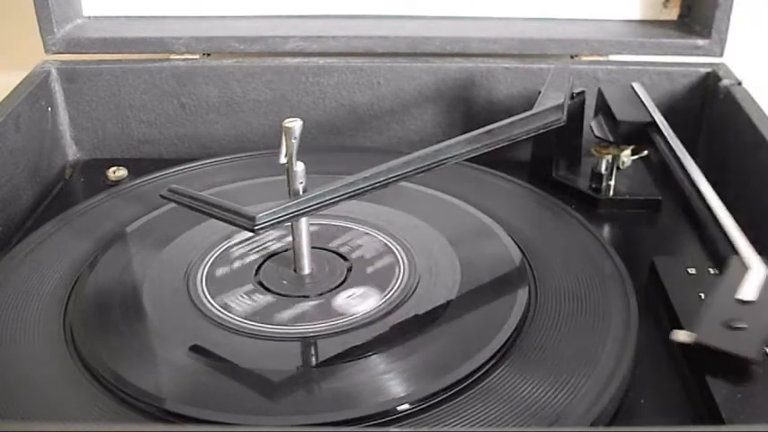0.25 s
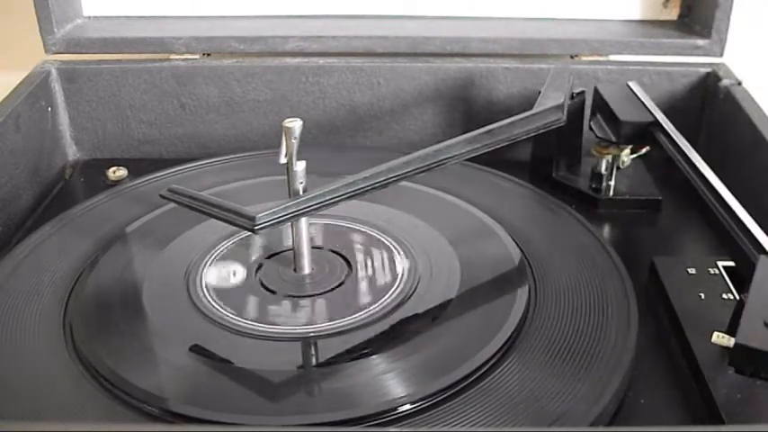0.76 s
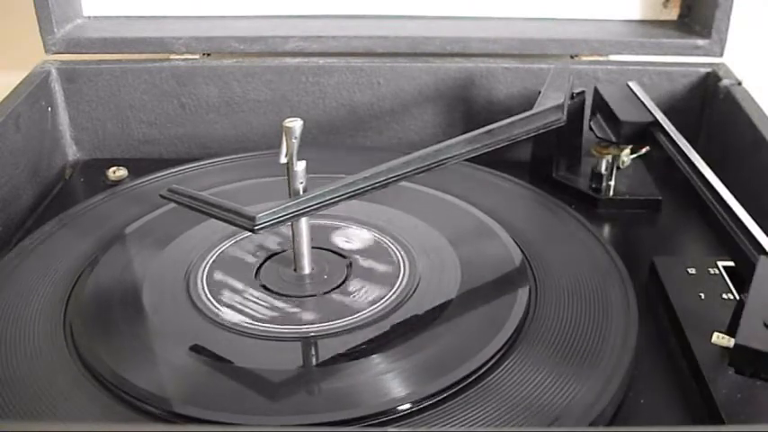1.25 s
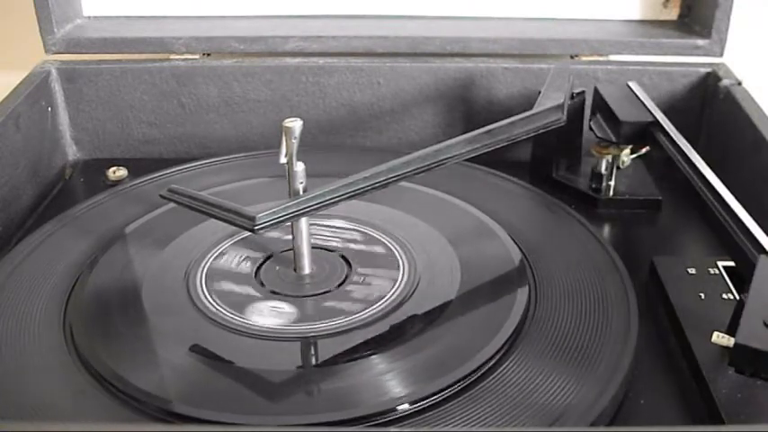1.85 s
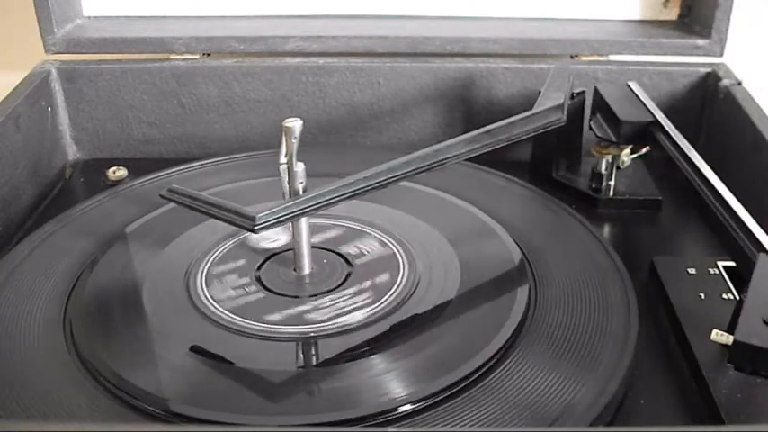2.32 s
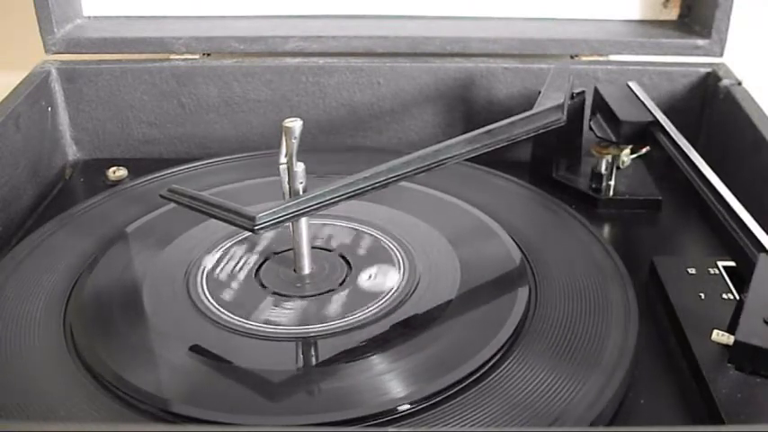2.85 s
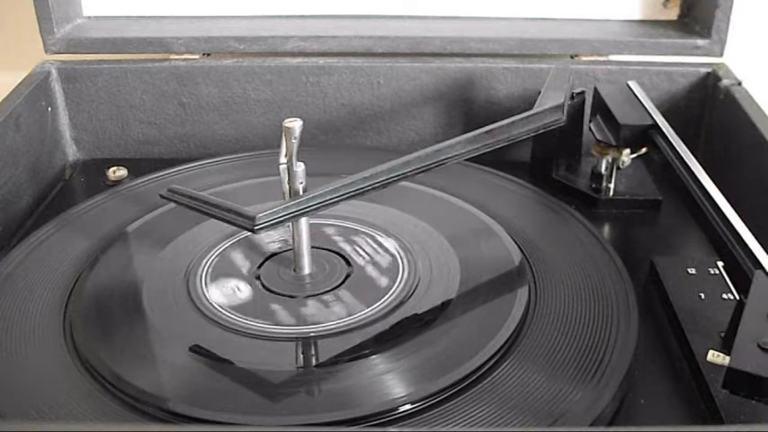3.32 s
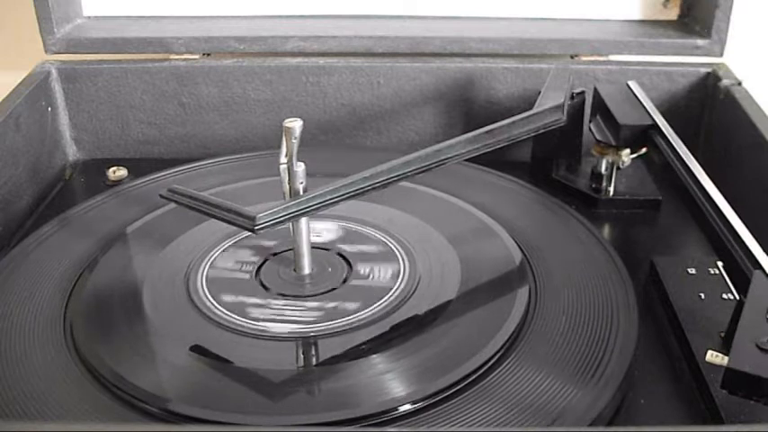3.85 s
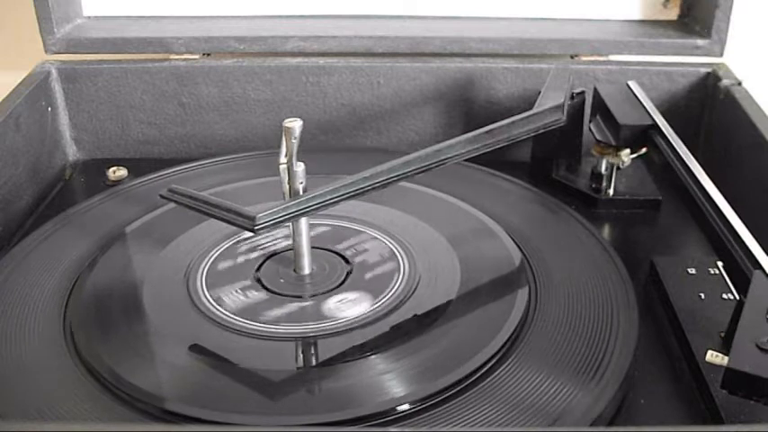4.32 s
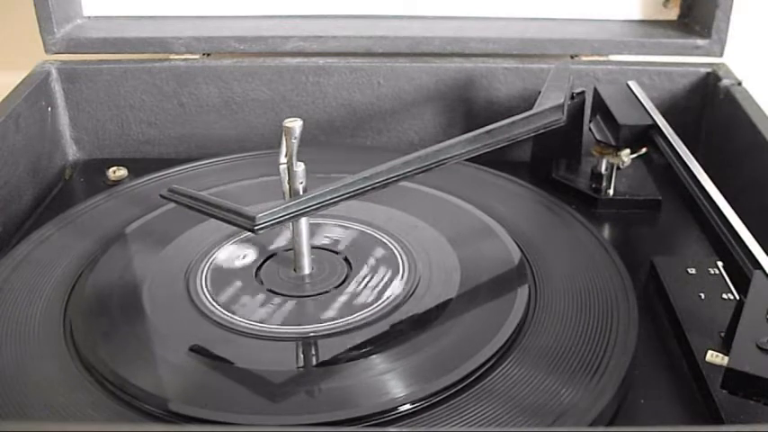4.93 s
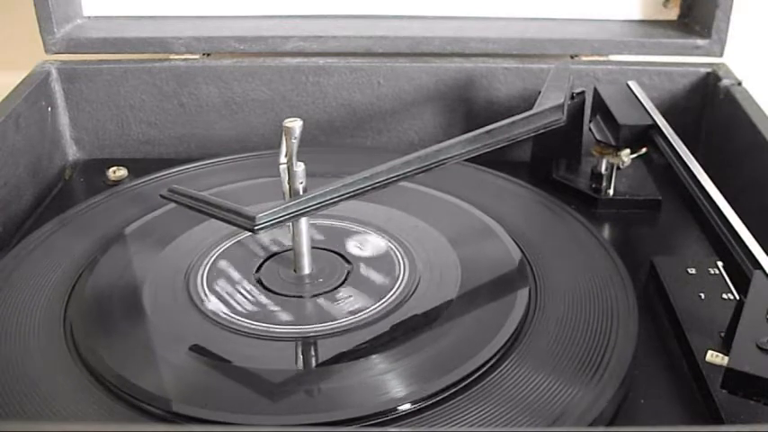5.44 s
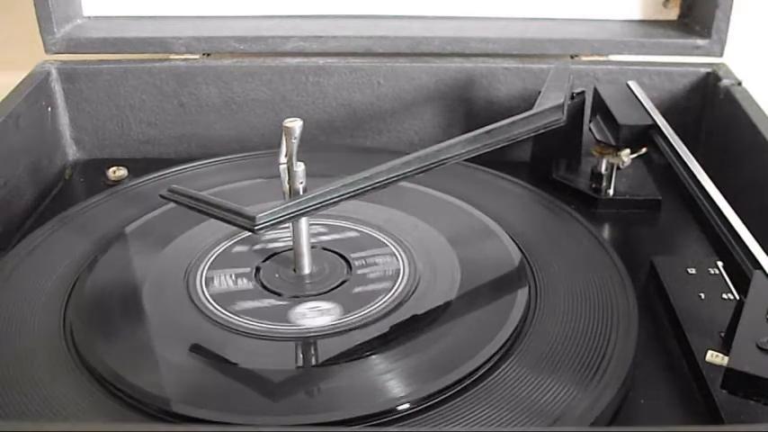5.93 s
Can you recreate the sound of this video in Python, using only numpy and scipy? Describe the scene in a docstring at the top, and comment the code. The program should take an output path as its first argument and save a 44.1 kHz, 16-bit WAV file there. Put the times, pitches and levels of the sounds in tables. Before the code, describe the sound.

Portable record player's changer clacks hard twice, knocks singly, then clatters and snaps to rest over quiet hum, hiss and faint whine.

```python
"""Soft knocks over a quiet hum, then hard clicks: a portable record player's changer parks its tonearm.
One microphone, close up in a quiet room, feeds both channels. Levers and cams knock under the steel deck,
ringing its modes amid bursts of noise; sliding parts shake it with gritty noise; a released lever rattles
to rest and the gear ticks faintly. Filtered noise makes the room rumble, motor murmur and amplifier hiss;
sines make the mains hum and the thin electronic whine."""
import sys
import numpy as np
from scipy import signal
from scipy.fft import rfft, irfft, next_fast_len
from scipy.io import wavfile
from scipy.ndimage import map_coordinates

SR = 44100
rng = np.random.default_rng(int(sys.argv[2]) if len(sys.argv) > 2 else 0)


def put_to_file(sound):
    """Save the sound as 16-bit audio at rate SR, in the file named by the first command-line argument."""
    columns = np.atleast_2d(sound).T  # one column per channel
    safe = np.clip(columns, -1, 1)
    whole_steps = np.round(safe * 32767)
    wavfile.write(sys.argv[1], SR, whole_steps.astype(np.int16))


N = 272521
SECONDS = np.arange(N) / SR

# modes of the steel deck: (frequency [Hz], relative level [dB], t60 before clipping and ring share [s])
DECK_MODES = [(470.5, -5.5, 0.36), (641, -2, 0.65), (895, -5.5, 0.19), (1016, -9.5, 0.3), (1224, -53, 0.18),
              (1357, -18, 0.55), (1546, -11.5, 0.17), (1898, -13.5, 0.039), (2015, -1.5, 0.33),
              (2413, -4.5, 0.21), (2508, 5.5, 0.038), (2890, -11, 0.067), (2766, -7, 0.16), (3200, 0, 0.12),
              (3450, -3, 0.05), (3476, -11.5, 0.047), (4440, -17, 0.096), (4355, 4.5, 0.029),
              (4810, -49, 0.063), (4840, 2, 0.03), (5400, -44, 0.16), (5500, 2.5, 0.1), (6050, -7, 0.073),
              (6150, -27, 0.066), (6568, -68, 0.13), (7640, 2, 0.2), (7488, -21, 0.091), (7709, -35, 0.1)]
# centres of the regions of the deck's sound: thump, knock, plate, steel, crack [Hz]
REGION_CENTRES = [560, 1950, 3500, 5300, 9600]
# their widths for sliding parts [share of the centre]; single contacts are narrower
REGION_WIDTHS = [1.186, 1.113, 0.69, 0.66, 2.34]


def amp(db):
    """Gain of a level in dB."""
    return 10 ** (np.asarray(db) / 20)


def unit(x):
    """x at rms 1."""
    return x / np.sqrt(np.mean(x ** 2) + 1e-20)


def along(points, hz):
    """Values at hz between (Hz, value) points, on a log frequency axis."""
    point_hz, values = np.transpose(points)
    return np.interp(np.log(hz + 1), np.log(point_hz + 1), values)


def filtered(x, response):
    """x times a response of frequency, padded so that the ends do not meet."""
    size = next_fast_len(x.shape[-1] + 8192)
    hz = np.fft.rfftfreq(size, 1 / SR)
    return irfft(rfft(x, size) * response(hz), size)[..., :x.shape[-1]]


def region(x, centre_hz, width):
    """What four like resonances in a row let through around one frequency, steeper above than below."""
    def response(hz):
        resonance = width * centre_hz / (centre_hz ** 2 - hz ** 2 + 1j * hz * width * centre_hz)
        return (hz * centre_hz) ** 2 * resonance ** 4

    return filtered(x, response)


def wobble(rate):
    """A smooth random curve with rate knots a second."""
    knots = rng.standard_normal(int(N * rate / SR) + 4)
    return map_coordinates(knots, [np.arange(N) * rate / SR])


def dying(t60s):
    """Noise in which each frequency dies at its own speed, energy 1."""
    hz, t, spectrum = signal.stft(rng.standard_normal(SR // 2), SR, nperseg=128)
    fading = spectrum * amp(-60 * t / along(t60s, hz)[:, None])
    tail = signal.istft(fading, SR, nperseg=128)[1]
    return tail / np.linalg.norm(tail)


def plate_level(steel_db):
    """Level of the plate region over the knock [dB]: it grows 0.45 dB for each dB of steel."""
    return -0.5 + 0.45 * steel_db


def knocks():
    """Each contact rings the deck's modes at new strengths, over a burst from the many small parts."""
    hollow_hz, hollow_width, hollow_db = 1166, 0.54, -18.5  # the hollow case booms a little here
    trim_db = -2.5  # lowers every contact
    out = np.zeros(N + SR)
    t = np.arange(SR // 6) / SR
    mode_hz, mode_db, mode_t60 = np.transpose(DECK_MODES)[:, :, None]
    for s, db, thump_db, steel_db, crack_db, thump_hz, knock_hz, share in contacts(count=7):
        life = np.clip(share, .1, 2)
        # the plate and steel regions that a contact favours scatter a little
        plate_hz, steel_hz = REGION_CENTRES[2:4] * np.exp(.06 * rng.standard_normal(2))

        # modes with new strengths and slightly new pitches
        chance = rng.standard_normal((len(DECK_MODES), 2))
        ring_s = life * np.clip(mode_t60, .03, .13)
        envelopes = amp(mode_db + 3.24 * chance[:, :1] - 60 * t / ring_s)
        scattered_hz = mode_hz * (1 + 0.0088 * chance[:, 1:])
        ring = np.sum(envelopes * np.sin(2 * np.pi * scattered_hz * t), 0)

        # the burst swells in about a millisecond; a short and a longer fall add up
        noise = rng.standard_normal(len(t))
        burst_fall = amp(-60 * t / (life * 0.12)) + 2.2 * amp(-60 * t / 0.026)
        body = ring + amp(8) * noise * (1 - np.exp(-t / 0.0011)) * burst_fall
        crack = noise * (amp(-60 * t / (life * 0.038)) + 0.27 * amp(-60 * t / (life * 0.2)))

        sounds = [(body, thump_db, thump_hz),
                  (body, 0, knock_hz),
                  (body, plate_level(steel_db), plate_hz),
                  (body, steel_db, steel_hz),
                  (crack, crack_db, REGION_CENTRES[-1]),
                  (body, hollow_db, hollow_hz)]
        start = round(s * SR)
        for (sound, part_db, centre_hz), width in zip(sounds, REGION_WIDTHS + [hollow_width]):
            part = region(sound, centre_hz, 0.76 * width)  # the place struck favours its own modes
            out[start:start + len(t)] += amp(db + part_db + trim_db) * part / np.max(np.abs(part))
    return out[:N]


def contacts(count):
    """Set knocks, the released lever's slowing rattle and the gear's chance ticks while the cam turns."""
    # lever contacts: (time [s], knock peak before the common trim [dB], case thump over the knock [dB],
    # steel over the knock [dB], crack over the knock [dB], thump [Hz], knock [Hz],
    # share of the deck's ring time [ratio])
    lever_knocks = [(0.0143, -43.5, -12, -21, -30, 240, 1530, 0.79),
                    (0.0759, -43, -8, -18, -28, 302, 1500, 0.8), (0.349, -48, -8, -19, -26, 590, 1530, .47),
                    (0.4492, -17.5, -13, -15, -19, 272, 2440, 0.54),
                    (0.4604, -32.5, -1.5, 5.5, 1.5, 610, 2620, 0.6),
                    (0.4726, -21.5, -13, -10, -12, 263, 2470, 0.34),
                    (0.4824, -35.5, 3, 3, -11, 374, 2620, 0.34),
                    (0.487, -35.5, -3, -11, -29, 680, 2320, 0.71),
                    (0.596, -11.5, -18.5, 0, -8.5, 494, 2110, 0.24),
                    (0.6024, -14, -11.5, -11.5, -15, 973, 2680, 0.93),
                    (0.6394, -37, -9, -10, -33, 620, 2340, 0.35),
                    (0.835, -46.5, 2, -10, -21, 312, 1440, 0.4),
                    (0.9058, -47, -8, -24, -27, 300, 2040, 0.96),
                    (1.6358, -17.5, -23.5, -20.5, -50, 445, 1970, 0.76),
                    (1.6489, -25.5, -14, -20, -46, 464, 2010, 0.82),
                    (1.8781, -49, -4, -15, -21, 620, 2490, 0.71),
                    (1.926, -41, -2, -30, -29, 415, 1680, 0.56),
                    (2.1091, -46.5, 0, -18, -22, 223, 2400, .7),
                    (2.651, -46, -21, -15, -26, 231, 1550, 0.59),
                    (3.0039, -37.5, -1, -21, -29, 370, 1530, 1),
                    (3.025, -32.5, -13, -4, -17, 380, 2100, 0.64),
                    (3.0415, -23.5, -30, -27, -43, 366, 2560, 0.54),
                    (3.1852, -40.5, -21, -25, -26, 290, 1560, 1.4),
                    (3.246, -43, -1, -19, -29, 480, 1490, 0.99),
                    (3.2879, -32.5, -12, -7.5, -36, 396, 2250, 0.79),
                    (3.3046, -14, -11.5, -23.5, -37, 495, 1840, 0.65),
                    (3.3864, -35, 3.5, -24, -35, 527, 1600, 0.36),
                    (3.4561, -23, -11, -22, -35, 670, 1830, 0.55),
                    (3.4744, -31, -7, -10, -12, 417, 2030, 0.35),
                    (3.5347, -32, -25.5, 0, -34, 608, 2080, 0.68),
                    (3.5984, -38.5, -10.5, -6.5, -26, 570, 2010, 0.81),
                    (3.7683, -33, -1.5, -13, -37, 650, 2380, 0.72),
                    (3.7788, -25.5, -9, -11.5, -26, 483, 1940, 0.46),
                    (3.7886, -13.5, -14.5, -23, -29, 846, 2450, 0.82),
                    (3.8068, -10.5, -25, -2, -23, 260, 2140, 0.45),
                    (3.8118, -15, -16, -5, 3.5, 433, 3300, 0.46),
                    (3.9994, -32, -2.5, -15, -33, 696, 1950, 1.1),
                    (5.1875, -52, -9, -2, -19, 261, 1540, 0.99),
                    (5.2322, -50, -23, -12, -18, 258, 1420, 0.9),
                    (5.3345, -53, -10, -7, -20, 258, 2580, 0.78)]
    # released lever: (thump over the knock [dB], steel [dB], crack [dB], thump [Hz], knock [Hz], share [ratio])
    lever_colour = (-20, -2.5, -32.5, 716, 2245, 1.13)
    # gear tick: the same columns
    tick_colour = (0.5, -19, -31, 334, 1700, 0.8)
    first_s, first_gap_s, gap_grows = 3.8224, 0.0064, 1.26  # each gap is 1.26 times the last
    rattle_db, loss_db = -13.5, 0.46  # peak before the trim; loss times the contact number squared
    ticks_per_s, tick_floor_db, tick_spread_db, cycle_end_s = 3, -50.5, 2.1, 4.2  # floor before the trim

    when = first_s + first_gap_s * (gap_grows ** np.arange(count) - 1) / (gap_grows - 1)
    rattle = [(s, rattle_db - loss_db * j ** 2, *lever_colour) for j, s in enumerate(when)]

    gaps, sizes = rng.exponential(size=(2, 3 * count))
    tick_times = np.cumsum(gaps) / ticks_per_s
    ticks = [(s, tick_floor_db + tick_spread_db * size, *tick_colour)
             for s, size in zip(tick_times, sizes) if s < cycle_end_s]
    return lever_knocks + rattle + ticks


def clatter():
    """Sliding parts: dense uneven contacts, each too quick to ring out, shake the same deck."""
    # slides: (start [s], rise [s], hold [s], first fall [dB/s], knock level in the hold [dB],
    # case thump over the knock [dB], steel over the knock [dB], crack over the knock [dB])
    slides = [(0.546, 0.023, 0.029, 3000, -45.5, -22, -2.5, -28),
              (3.01, 0.031, 0.0018, 1000, -33.5, -3.5, -20, -29),
              (3.785, 0.013, 0.004, 888, -28, -19, -16, -37),
              (3.796, 0.012, 0.057, 303, -26, -11.5, -2, -11)]
    rise_db, knee_db, tail_slows = 25.5, 15.5, 0.54  # height of the rise; past the knee the fall slows

    def deck_response(hz):
        total = 1.6
        for k, (mode_hz, mode_db, _) in enumerate(DECK_MODES):
            resonance = 150j * hz / (mode_hz * mode_hz - hz * hz + 150j * hz)  # 150 Hz wide
            total = total + (-1) ** k * amp(mode_db) * resonance
        return total

    grit = rng.standard_normal(N) * amp(np.minimum(4 * rng.exponential(size=N), 14))
    shaken = filtered(grit, deck_response) * amp(2.1 * wobble(130))
    parts = [unit(region(shaken, hz, width)) for hz, width in zip(REGION_CENTRES, REGION_WIDTHS)]

    out = np.zeros(N)
    for s, rise, hold, fall, db, thump_db, steel_db, crack_db in slides:
        since = SECONDS - s
        lost_db = fall * np.maximum(since - rise - hold, 0)
        lost_db = np.minimum(lost_db, knee_db + tail_slows * (lost_db - knee_db))
        still_to_rise_db = rise_db * np.clip(1 - since / rise, 0, 1)
        shape = (since > 0) * amp(db - still_to_rise_db - lost_db)
        part_dbs = [thump_db, 0, plate_level(steel_db), steel_db, crack_db]
        out += shape * sum(part * amp(part_db) for part, part_db in zip(parts, part_dbs))
    return out


def room(x):
    """A small room's tail: decaying noise, drawn anew every quarter second, 300 samples late."""
    # decay of the room: (frequency [Hz], t60 [s])
    room_decay = [(200, 0.81), (1500, 0.27), (5000, 0.24), (12000, 0.21)]
    wet, step = np.zeros(N + SR), SR // 4
    for start in range(0, N, step):
        tail = signal.fftconvolve(x[start:start + step], dying(room_decay))
        wet[start:start + len(tail)] += tail
    return np.pad(wet, (300, 0))[:N]


def hiss():
    """Room rumble and motor murmur ease once the cam lets go; the amplifier's treble hiss stays."""
    # colour of the background within each band: (frequency [Hz], relative density [dB per Hz])
    noise_colour = [(12, -17.5), (22, -3.5), (30, -7.5), (45, -15), (80, -17), (150, -24), (260, -20),
                    (480, -24), (680, -22), (850, -29), (1180, -25), (1420, -37), (2500, -38.5),
                    (6000, -46), (9000, -49), (13900, -51), (15600, -54)]
    middle_from_hz, treble_from_hz = 1400, 6000
    unload_s = 4.2
    easing_s = [unload_s - .1, unload_s + 0.086]
    # (loaded, idle) level, each with a fixed lift [dB rms]
    low_db = 4.5 + np.interp(SECONDS, easing_s, [-58.5, -60])
    middle_db = 1.02 + np.interp(SECONDS, easing_s, [-64.5, -66])
    noise = filtered(rng.standard_normal(N), lambda hz: amp(along(noise_colour, hz)))

    def band(low_hz, high_hz):
        return unit(filtered(noise, lambda hz: (hz >= low_hz) & (hz < high_hz)))

    # a slow drift and a quicker waver on each of the lower bands
    low_db = low_db + .5 * wobble(1.39) + 0.45 * wobble(8.3)
    middle_db = middle_db + .5 * wobble(1.1) + 0.79 * wobble(7.4)
    low = band(0, middle_from_hz) * amp(low_db)
    middle = band(middle_from_hz, treble_from_hz) * amp(middle_db)
    treble = band(treble_from_hz, SR) * amp(-68)
    return low + middle + treble


def mains_hum():
    """Multiples of the mains frequency, each a sine wavering in level by itself."""
    # overtones: (multiple of the mains [ratio], level before wavering [dB rms])
    overtones = [(1.5, -76), (2, -67), (5, -73), (7, -82), (11, -72), (13, -71), (15, -75), (19, -79),
                 (23, -81.5)]
    mains_hz = 50.03
    hum = np.zeros(N)
    for multiple, db in overtones:
        level = amp(db + 3 + 3.0 * wobble(15))  # 3 dB takes a sine's rms to its peak
        hum += level * np.sin(2 * np.pi * (multiple * mains_hz * SECONDS + rng.random()))
    return hum


def whine():
    """A high electronic tone and its overtone, whose phase runs ahead and slips back at a steady rate."""
    # partials: (multiple of the whine [ratio], level [dB rms])
    partials = [(1, -70.5), (2, -75)]
    whine_hz, flutter_hz, slip_turns = 6783.2, 23.9, .335  # frequency before the phase runs ahead
    turns = whine_hz * SECONDS + slip_turns * (flutter_hz * SECONDS % 1)
    return sum(amp(db) * np.sqrt(2) * np.sin(2 * np.pi * multiple * turns) for multiple, db in partials)


def channels(x, lag):
    """One signal on two channels; the left lags by up to a sample, except while they run in step."""
    def turn(hz):
        half_turn = np.pi * hz * along(lag, hz) / SR  # left half a lag late, right half a lag early
        return np.exp(1j * half_turn * np.array([[-1], [1]]))

    in_step = (SECONDS > 3.42) & (SECONDS < 4.92)
    return np.where(in_step, x, filtered(np.array([x, x]), turn))


def scene():
    """The mechanism close to the microphone, its room, and the steady background."""
    # left channel after right, for the mechanism: (frequency [Hz], lag [samples])
    changer_lag = [(250, 0.15), (700, 0.22), (1200, 0.75), (4000, 1), (15000, 0.99)]
    # the same for the background: (frequency [Hz], lag [samples])
    background_lag = [(500, 0.01), (1700, 0.069), (3500, 0.99), (6000, 1), (15000, 0.99)]
    changer = knocks() + clatter()
    in_room = changer + amp(-12.5) * room(changer)
    background = hiss() + mains_hum() + whine()
    return channels(in_room, changer_lag) + channels(background, background_lag)


def record(dry):
    """The converter sits slightly off zero and keeps nothing above its band limit."""
    offset, top_hz = -0.0141, 15725  # offset as a share of full scale
    return offset + filtered(dry, lambda hz: hz < top_hz)


dry = scene()
out = record(dry)
put_to_file(out)
```